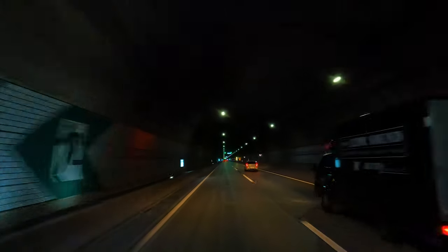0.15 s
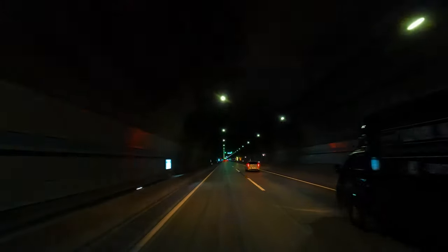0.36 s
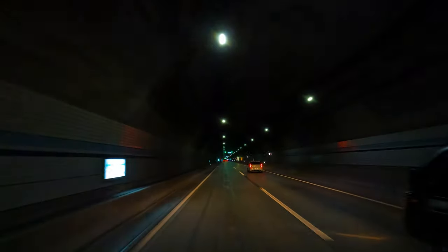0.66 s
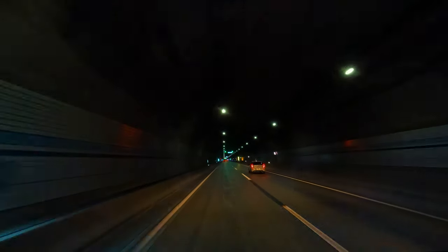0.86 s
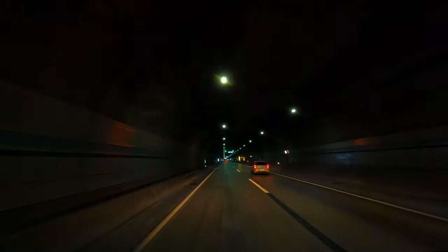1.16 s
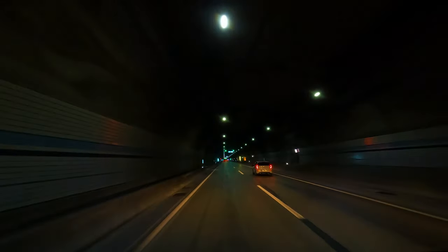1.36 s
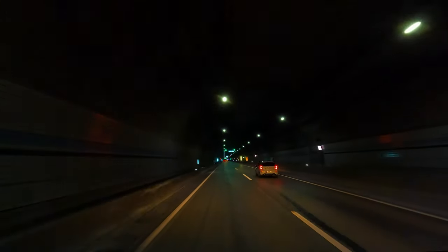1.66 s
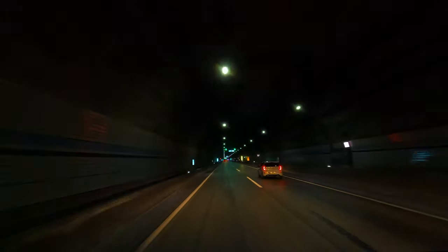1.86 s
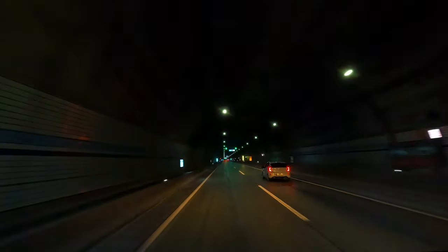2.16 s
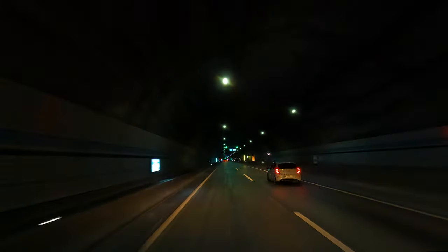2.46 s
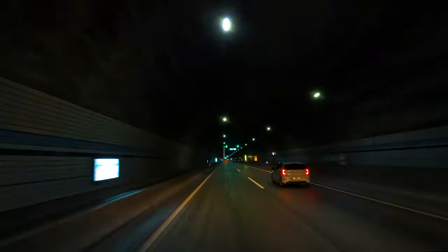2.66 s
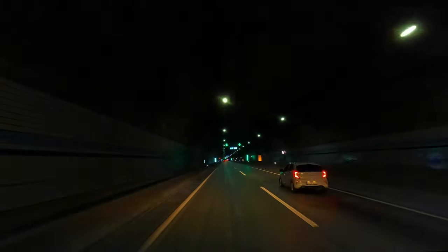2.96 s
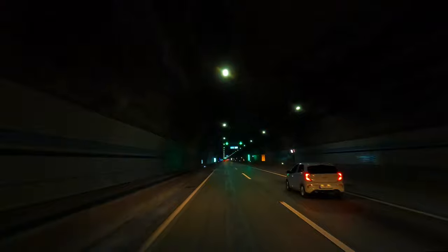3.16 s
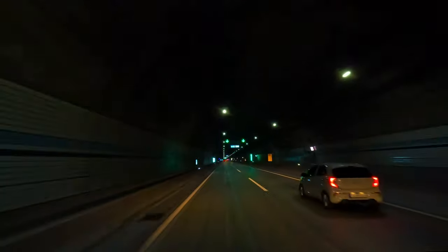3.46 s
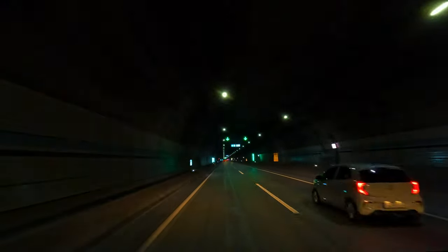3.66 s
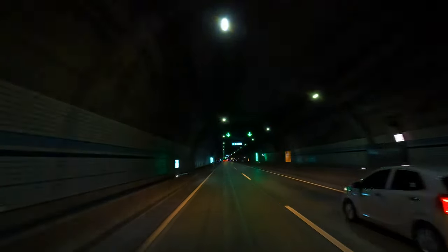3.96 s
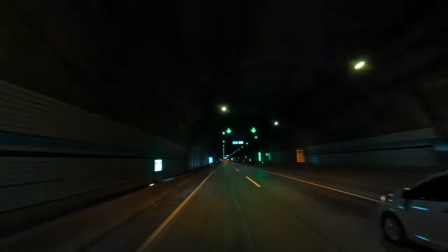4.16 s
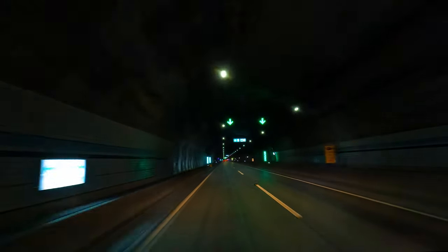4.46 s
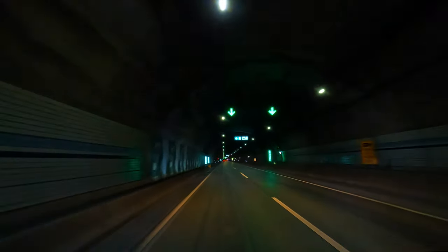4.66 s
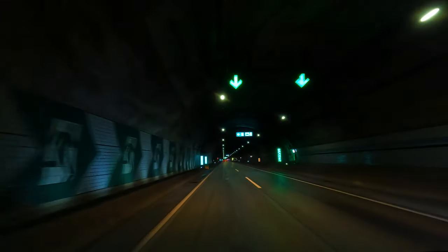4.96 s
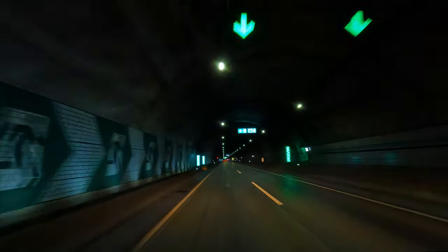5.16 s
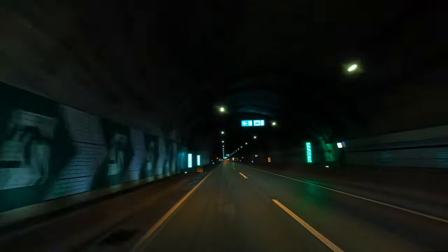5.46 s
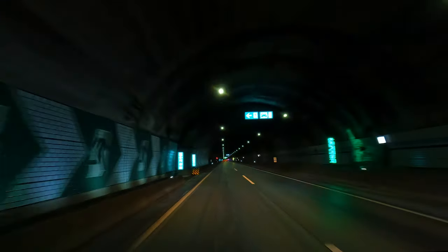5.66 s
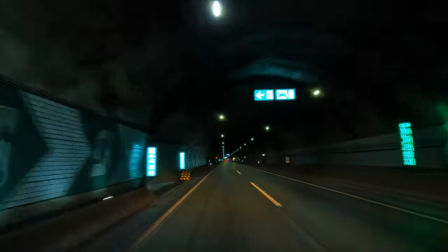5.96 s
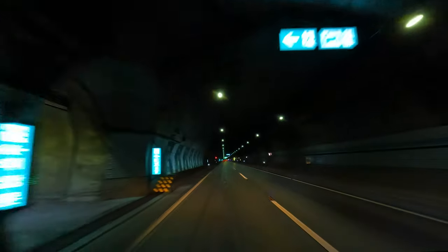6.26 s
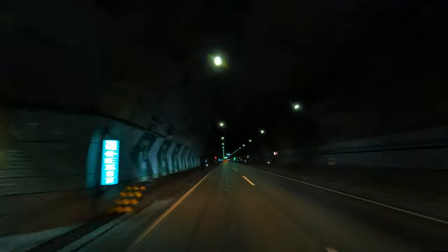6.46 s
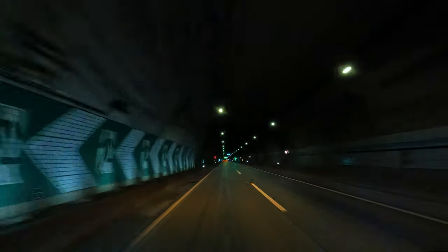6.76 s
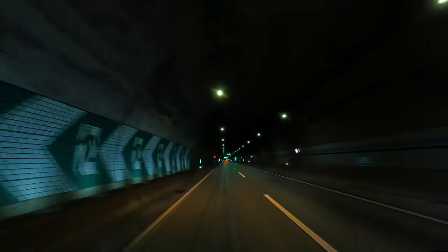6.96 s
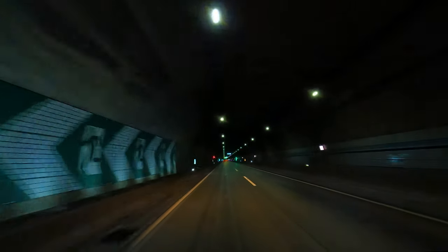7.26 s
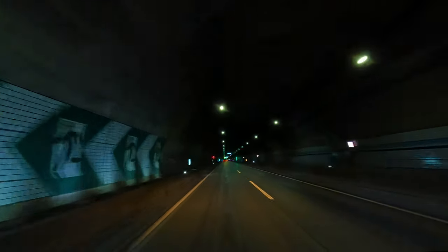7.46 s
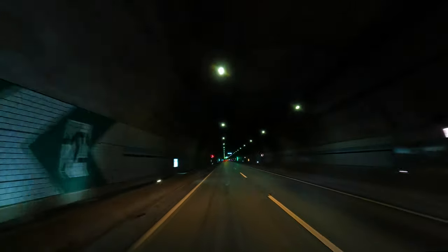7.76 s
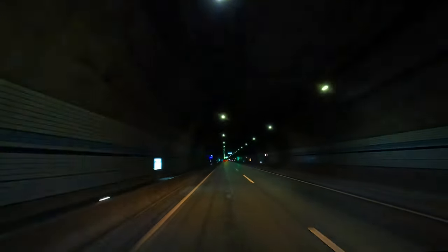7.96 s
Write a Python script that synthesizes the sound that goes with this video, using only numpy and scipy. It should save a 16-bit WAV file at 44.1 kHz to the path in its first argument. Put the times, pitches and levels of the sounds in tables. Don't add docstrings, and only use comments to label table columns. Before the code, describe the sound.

Constant bassy cabin drone and rough tyre rumble through a road tunnel, with gentle wind hiss, a thin whine, and two dull passes of overtaken vehicles.

```python
import sys
import numpy as np
from scipy import signal
from scipy.fft import rfft, irfft, next_fast_len
from scipy.io import wavfile
from scipy.ndimage import uniform_filter1d

SR = 44100
rng = np.random.default_rng(int(sys.argv[2]) if len(sys.argv) > 2 else 0)


def natural_amplitude(level_db):
    exponent = np.asarray(level_db, float) / 20
    return 10 ** exponent


def put_to_file(sound):
    columns = np.atleast_2d(sound).T
    safe = np.clip(columns, -1, 1)
    whole_steps = np.round(safe * 32767)
    wavfile.write(sys.argv[1], SR, whole_steps.astype(np.int16))


N = 358091

# (frequency [Hz], density [dB per Hz])
BODY_COLOUR = [(4, -5.5), (12, -9), (27, 3), (45, -1), (58, 0), (70, 5.5), (84, -1.5), (105, 3.5),
               (140, 2.5), (158, -6.5), (225, -5.5), (242, -12.5), (285, -6.5), (325, -8.5), (345, -9.5),
               (420, -12)]
TYRE_COLOUR = [(380, 3), (450, 0.5), (530, -3), (585, -7), (650, -3.5), (750, -4), (900, -8.5),
               (1000, -7.5), (1150, -9.5), (1300, -13), (1450, -14.5), (1600, -16)]
WIND_COLOUR = [(1450, 1.5), (1600, 0), (1750, -3), (2100, -5.5), (2500, -9), (2850, -11.5), (3200, -9),
               (3450, -11), (3900, -14), (4700, -19), (5800, -28.5), (7000, -31), (8200, -35), (9500, -43),
               (10500, -47), (12700, -52.5)]
BODY_EDGES_HZ = (18, 50, 92, 160, 250, 400)
TYRE_EDGES_HZ = (400, 580, 850, 1500)
WIND_EDGES_HZ = (1500, 2800, 5500, 11000)
BODY_DB, BODY_FOLLOWS = (-40.5, -39, -37, -39.5, -41.5), (0.5, 0.3, -0.3, -0.05, 0.2)
TYRE_DB, TYRE_FOLLOWS = (-45, -46.5, -46), (0.72, 1.7, 1.3)
WIND_DB, WIND_FOLLOWS = (-52.5, -60.5, -73.5), (0.96, 1.1, 0.93)

# (time [s], pitch [Hz], swell [dB])
BUMPS = [(0.18, 121, 2.9), (0.19, 316, 3), (0.29, 30, 1.5), (0.45, 121, 1.5), (0.61, 121, 1.5),
         (1.12, 30, 0), (1.12, 316, 4.5), (1.19, 121, 2.5), (1.33, 316, 2.5), (1.82, 200, 3),
         (1.83, 316, 2), (2.01, 30, -1), (2.15, 200, 3.5), (2.5, 67, 1), (2.53, 316, 1.5), (2.69, 316, 3.5),
         (2.97, 316, 3.5), (3.09, 121, 3.5), (3.11, 316, 0.5), (3.2, 67, 2), (3.3, 316, 2), (3.43, 67, 6.5),
         (3.64, 30, 4.5), (3.79, 67, 2), (3.93, 316, 2), (3.95, 67, 6), (4.18, 316, 2), (4.2, 67, 2),
         (4.34, 67, 2), (4.9, 67, 5.5), (4.99, 200, 6), (5.02, 30, 2.5), (5.27, 121, 4), (5.29, 316, 3.5),
         (5.35, 200, 5), (5.54, 30, 6.5), (5.67, 121, 2), (5.81, 67, 5.5), (5.99, 67, 2), (6.19, 67, 2),
         (6.38, 67, 5), (6.47, 30, 2.5), (6.51, 316, 1.8), (6.65, 200, 4.5), (6.68, 316, 1.5),
         (6.84, 121, 1.5), (6.86, 316, 3), (6.93, 30, 3), (7.02, 121, 3.5), (7.05, 316, 3), (7.17, 121, 4),
         (7.65, 121, 3.5), (7.75, 67, 2.5), (7.78, 200, 3.5), (7.92, 200, 3.5), (8.01, 67, 7), (2.1, 67, 1),
         (4.3, 30, 2), (5.55, 200, 2), (6.05, 30, 3)]
# (time [s], pitch [Hz], dip [dB])
LULLS = [(0.15, 67, -7), (0.34, 316, -2.5), (0.37, 200, -4.5), (0.43, 30, -6), (0.52, 200, -9),
         (0.61, 30, -6), (0.77, 30, -8), (1.27, 30, -7), (1.47, 200, -6), (1.61, 67, -4), (2.04, 121, -6),
         (2.05, 316, -2.5), (2.26, 121, -6), (2.51, 30, -4.5), (2.63, 67, -5.5), (2.7, 30, -5.5),
         (2.81, 121, -4), (2.82, 200, -3.5), (3.06, 67, -5.5), (3.58, 67, -1), (3.81, 316, -3),
         (3.82, 121, -4), (3.96, 30, -2.5), (4.21, 121, -5.5), (4.29, 316, -6.5), (4.67, 67, -1),
         (4.76, 200, -4), (4.91, 30, -8), (5.17, 316, -1), (5.75, 316, -2), (5.92, 316, -4),
         (5.96, 30, -2.5), (6.2, 121, -3.5), (6.39, 316, -4.5), (6.43, 121, -6.5), (6.52, 200, -7),
         (6.66, 67, 0), (6.96, 67, -6), (7.32, 200, -5.5), (7.32, 316, -1), (7.56, 67, -6),
         (7.72, 30, -3.5), (7.78, 121, -5), (7.95, 121, -2), (0.1, 316, -4), (0.75, 200, -2),
         (1.55, 200, -2.5), (1.8, 30, -4), (2.3, 200, -2.5), (2.55, 121, -4), (4.6, 200, -3), (5.1, 30, -5),
         (6.2, 30, -5), (7.25, 121, 0), (1.4, 121, -1), (0.9, 121, -2), (6.15, 316, -1.5), (5.0, 316, -2)]
# (time [s], tread noise [dB])
ROAD = [(0.0, -43), (0.49, -42), (0.8, -42.5), (1.91, -41), (2.25, -41.5), (2.59, -42.5), (3.08, -41.5),
        (4.1, -42.5), (4.82, -41), (5.46, -42.5), (5.8, -42.0), (6.52, -40.5), (6.99, -42), (7.33, -42),
        (7.72, -42.5), (8.07, -41.5)]
# (time [s], change [dB])
PATCHES = [(0.31, -2), (0.42, 1), (0.68, -3), (1.07, 1.3), (1.2, 1.5), (1.34, -1.5), (1.95, 1.5), (2.26, 2),
           (2.34, -2.5), (2.42, 0), (2.55, -2), (2.84, 1), (4.06, -2), (4.23, -2), (4.4, 1.0), (4.49, -3.5),
           (4.61, -1.5), (4.7, 1.5), (5.29, 1), (5.43, -0.5), (5.67, -2), (5.79, 2.5), (5.91, -1.5),
           (6.47, 1), (6.82, 1), (6.92, -2.3), (6.96, 0), (7.41, 2), (0.15, -0.5), (0.8, -1), (1.55, 1),
           (1.8, 0.5), (2.1, -0.5), (3.3, 0), (3.75, -1.5), (5.22, 0.5), (7.05, -0.2), (7.33, 0.5),
           (7.55, 0.5)]
# (time [s], level [dB])
TREAD_WHINE = [(0, -59), (.6, -57), (.8, -63), (1.6, -62), (2.0, -58), (2.5, -61), (3.0, -57), (3.6, -60),
               (4.1, -66), (4.5, -62), (4.7, -57), (5.5, -59), (6.0, -56), (6.6, -55), (7.4, -56),
               (7.9, -62)]
# (time [s], pitch [Hz], peak [dB])
KNOCKS = [
    (3.796, 560, -28),
    (7.324, 1000, -31),
    (8.1203, 260, -24),
]
# (time [s], hiss [dB])
AIRFLOW = [(0.0, -62.5), (0.25, -64), (0.56, -61), (0.96, -61.5), (1.84, -61.5), (2.48, -63), (2.97, -60.5),
           (3.5, -63), (4.03, -64), (4.79, -61), (5.49, -63.5), (5.95, -63.5), (6.52, -62), (7.1, -64.5),
           (7.42, -64), (8.07, -61.5)]
# (time [s], change [dB])
BUFFETS = [(0.29, -1), (0.5, 1), (0.54, 0), (0.77, -1.5), (0.94, 1.5), (1.12, -1), (1.27, 1.5),
           (1.39, -0.5), (1.62, 1), (1.71, 0.2), (1.93, 0.5), (2.84, 0.5), (3.26, -0.5), (3.42, -1.5),
           (4.06, -1.5), (4.8, 1), (5.23, 1), (5.35, -1.5), (5.92, -1), (6.61, 1), (6.79, 1), (6.92, -0.3),
           (7.08, -1), (7.2, 0), (7.35, 3), (7.46, 2.5), (7.67, -0.5), (7.81, 0.5), (0.15, 0.5),
           (0.7, -0.5), (2.45, -0.5), (3.1, 0.5), (4.55, -1.7), (4.65, 0.2), (5.58, 0.2), (5.7, 0),
           (7.0, 0.5)]
BUMP_S, PATCH_S, BUFFET_S = 0.051, 0.031, 0.044
# (time abreast [s], level [dB], half length [s])
OVERTAKEN = [
    (0.152, -45, 0.14),
    (3.402, -44.5, 0.64),
]
# (time [s], pitch [Hz], level [dB])
NEIGHBOUR_WHINE = [
    (2.6, 1050, -77),
    (2.9, 1075, -64),
    (3.3, 1130, -58),
    (4.1, 1120, -55),
    (4.4, 1173, -55),
    (4.9, 1177, -54),
    (5.3, 1200, -78),
]

# (frequency [Hz], width [Hz], height over the noise [dB])
MODES = [(530, 22, 2.5), (645, 20, 2), (2440, 40, 2.5), (2580, 40, 2.5), (2672, 14, 3.5), (3075, 50, 2.5),
         (3690, 60, 3), (1056, 20, 2), (1534, 8, 4.7), (1609, 8, 4.7), (1636, 11, 6.5), (1833, 20, 6.7),
         (1916, 8, 4.5), (1986, 9, 8), (2131, 11, 7), (2207, 11, 5.0), (2343, 23, 3.5), (2713, 17, 4),
         (2901, 12, 4.3), (3165, 8, 5.6), (3195, 14, 8), (3262, 13, 4.4), (3423, 8, 4.3), (3493, 11, 4.4),
         (3579, 13, 8), (3816, 19, 8.5), (3967, 9, 11), (4263, 8, 4), (5345, 11, 6.0), (5673, 10, 6.2),
         (5916, 13, 7.0), (5986, 25, 7.0), (6201, 10, 6.3), (6395, 35, 6.2), (10858, 28, 8.8),
         (7634, 20, 5), (11326, 30, 6)]
# (delay [ms], level [dB])
CABIN = [(3.7, -42.5), (10.3, -34), (12.4, -24)]
# (frequency [Hz], side minus mid [dB])
WIDTH = [(150, -58), (250, -41.5), (330, -43.5), (420, -24), (520, -15), (700, -19), (1000, -13.5),
         (1500, -14), (2400, -14.5), (3700, -15.5), (5500, -15.5), (7500, -16.5), (9500, -15.5),
         (12000, -18)]
# (frequency [Hz], width [Hz])
SIDE_GAPS = [(1900, 50), (3340, 30), (3790, 70), (4130, 50)]
TUNNEL_DELAY_S, TUNNEL_T60_S, TUNNEL_DB = 0.0585, 0.31, -6.5

SIZE = next_fast_len(N + SR)
LEAD = SR * 3 // 4
TIME_S = (np.arange(SIZE) - LEAD) / SR
HZ = np.arange(SIZE // 2 + 1) * SR / SIZE + 1e-3
OCTAVE = np.log2(HZ)


def body():
    levels = following(change(ROAD, [], PATCH_S), BODY_DB, BODY_FOLLOWS)
    for s, hz, db in BUMPS + LULLS:
        levels[np.searchsorted(BODY_EDGES_HZ, hz) - 1] += swell(s, db, BUMP_S)
    boom = rushing(levels, BODY_COLOUR, BODY_EDGES_HZ, flicker_db=0.0, flicker_rate=4.3,
                   depth=1.0, outer_hz=(1.5, 400))
    return evened(boom)


def evened(x):
    deep = irfft(rfft(x) * band(1.5, 100) ** 2, SIZE)
    flat = even(deep, 0.025, 0.27)
    return x - deep + unit(flat) * np.std(deep)


def tyres():
    levels = following(change(ROAD, PATCHES, PATCH_S), TYRE_DB, TYRE_FOLLOWS)
    return rushing(levels, TYRE_COLOUR, TYRE_EDGES_HZ, flicker_db=-0.07, flicker_rate=21,
                   depth=0.35, outer_hz=(400, 1500))


def whine():
    t = np.arange(N) / SR
    pitch_hz = 1062 + 1.6 * walk(3.5)[:N]
    level = natural_amplitude(np.interp(t, *np.transpose(TREAD_WHINE)) + 4)
    return level * tone(pitch_hz)


def knocks():
    t = np.arange(N) / SR
    out = np.zeros(N)
    for s, hz, db in KNOCKS:
        cycles = (t - s) * hz
        out += natural_amplitude(db) * np.cos(2 * np.pi * cycles) * np.exp(-(cycles / 1.1) ** 2)
    return out


def wind():
    flap_hz = 8.5 + 2.2 * walk(5)
    flap = tone(flap_hz) * (1 + 0.37 * walk(1.2))
    gust = natural_amplitude(0.56 * flap + 0.66 * walk(30))
    levels = following(change(AIRFLOW, BUFFETS, BUFFET_S), WIND_DB, WIND_FOLLOWS)
    hiss = rushing(levels, WIND_COLOUR, WIND_EDGES_HZ, flicker_db=0.06, flicker_rate=11,
                   depth=0.25, outer_hz=(1500, 13300))
    return gust * hiss


def traffic():
    through_doors = band(298, 660)
    roar = unit(irfft(rfft(rng.standard_normal(SIZE)) * through_doors, SIZE))
    passing = sum(swell(s, natural_amplitude(db), half_s) for s, db, half_s in OVERTAKEN)
    s, hz, level_db = np.transpose(NEIGHBOUR_WHINE)
    pitch_hz = np.interp(TIME_S, s, hz) + 3 * walk(8)
    level = natural_amplitude(np.interp(TIME_S, s, level_db))
    return level * tone(pitch_hz) + roar * passing


def shudder(panels):
    burst_db = 1.2 * walk(22)[:N] - 0.17
    return panels * (natural_amplitude(burst_db) - 1)


def echo():
    t = np.arange(SR // 2) / SR
    late = np.clip(t - TUNNEL_DELAY_S, 0, None)
    build_up = np.clip(late / 0.011, 0, 1)
    decay = np.exp(-np.log(1000) * late / TUNNEL_T60_S)
    tail = rng.standard_normal(len(t)) * build_up * decay
    return rfft(tail / np.sqrt(np.sum(tail ** 2)), SIZE)


def ringing():
    ring = 1
    for hz, width, db in MODES:
        ring = ring * (1 + (natural_amplitude(db) - 1) / (1 + 2j * (HZ - hz) / width))
    return ring


def space():
    above_bass = band(455, SR)
    early = sum(natural_amplitude(db) * np.exp(-2j * np.pi * HZ * ms / 1000) for ms, db in CABIN)
    ring = ringing()
    mid = ring * (1 + above_bass * (early + natural_amplitude(TUNNEL_DB) * echo()))
    mid = mid / np.sqrt(uniform_filter1d(abs(mid) ** 2, size=3000))
    gaps = 1
    for hz, width in SIDE_GAPS:
        gaps = gaps * (1 - 0.85 * np.exp(-((HZ - hz) / width) ** 2))
    side = natural_amplitude(on_log(WIDTH) - 1.1) * ring * gaps * echo()
    return mid, side


def rushing(levels, colour, edges_hz, flicker_db, flicker_rate, depth, outer_hz):
    spectrum = rfft(rng.standard_normal(SIZE)) * natural_amplitude(on_log(colour))
    out = 0
    for k, db in enumerate(levels):
        lo, hi = edges_hz[k], edges_hz[k + 1]
        reach_lo = outer_hz[0] if k == 0 else lo
        reach_hi = outer_hz[1] if k == len(levels) - 1 else hi
        reached = spectrum * band(reach_lo, reach_hi)
        inner = spectrum * band(lo, hi)
        share = np.sqrt(np.sum(abs(reached) ** 2) / np.sum(abs(inner) ** 2))
        window_s = 6.5 / np.sqrt(lo * hi) + 0.12
        noise = unit(even(unit(irfft(reached, SIZE)), window_s, depth))
        out = out + share * noise * natural_amplitude(db + flicker_db * walk(flicker_rate))
    return out


def following(control_db, rest_db, follows):
    return np.array(rest_db)[:, None] + np.array(follows)[:, None] * control_db


def change(curve, events, half_s):
    s, db = np.transpose(curve)
    slow = np.interp(TIME_S, s, db - np.mean(db))
    return slow + sum(swell(*event, half_s) for event in events)


def swell(s, height, half_s):
    return height * np.clip(1 - ((TIME_S - s) / (1.72 * half_s)) ** 2, 0, 1) ** 2


def tone(pitch_hz):
    return np.sin(2 * np.pi * np.cumsum(pitch_hz) / SR)


def walk(rate):
    k = int(SR / rate)
    held = np.repeat(rng.standard_normal(SIZE // k + 1), k)
    return 0.886 * uniform_filter1d(uniform_filter1d(held, k), k)[:SIZE]


def even(x, window_s, depth):
    k = int(window_s * SR)
    power = uniform_filter1d(uniform_filter1d(x ** 2, k), k) + 1e-12
    return x * power ** (-np.clip(depth, 0, 1) / 2)


def band(lo_hz, hi_hz):
    rise = np.clip((OCTAVE - np.log2(lo_hz)) / 0.3 + 0.5, 0, 1)
    fall = np.clip((OCTAVE - np.log2(hi_hz)) / 0.3 + 0.5, 0, 1)
    return np.sin(np.pi / 2 * rise) * np.cos(np.pi / 2 * fall)


def on_log(table):
    hz, db = np.transpose(table)
    return np.interp(np.log(HZ), np.log(hz), db)


def unit(x):
    return x / np.sqrt(np.mean(x ** 2))


def scene():
    sound = rfft(body() + tyres() + wind() + traffic())
    mid_response, side_response = space()
    mid = irfft(sound * mid_response, SIZE)[LEAD:LEAD + N]
    side = irfft(sound * side_response, SIZE)[LEAD:LEAD + N]
    panels = irfft(sound * mid_response * band(130, 480), SIZE)[LEAD:LEAD + N]
    mid = mid + whine() + knocks() + shudder(panels)
    return np.array([mid + side, mid - side])


def band_limit(x):
    return signal.sosfilt(signal.butter(12, 12740, fs=SR, output="sos"), x)


def record(dry):
    k = int(0.0031 * SR)
    swing = uniform_filter1d(uniform_filter1d(dry.mean(axis=0) ** 2, k), k)
    held = natural_amplitude(0.29) * dry * (1 + (swing / natural_amplitude(-25) ** 2) ** 2) ** -0.14
    fade_in = np.clip(np.arange(N) / SR / 0.0015, 0, 1)
    return band_limit(held * fade_in)


dry = scene()
out = record(dry)
put_to_file(out)
```